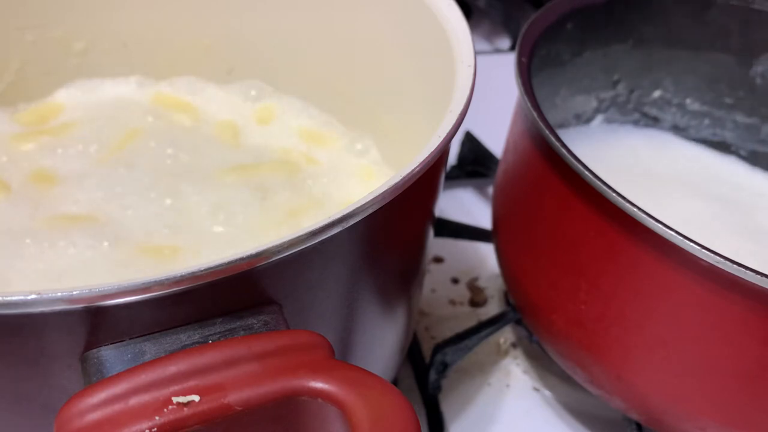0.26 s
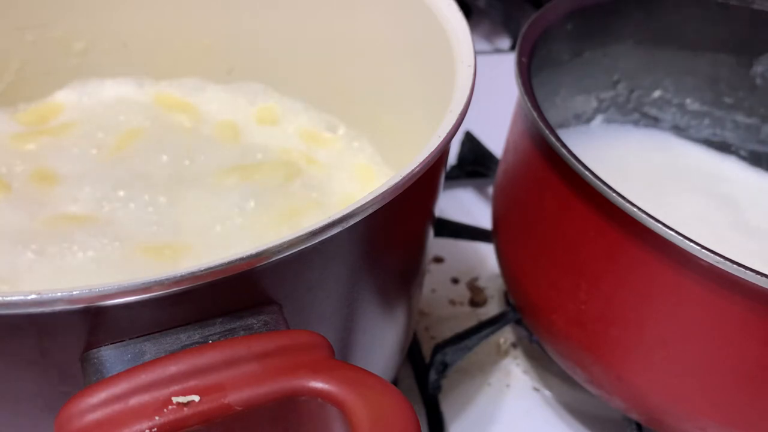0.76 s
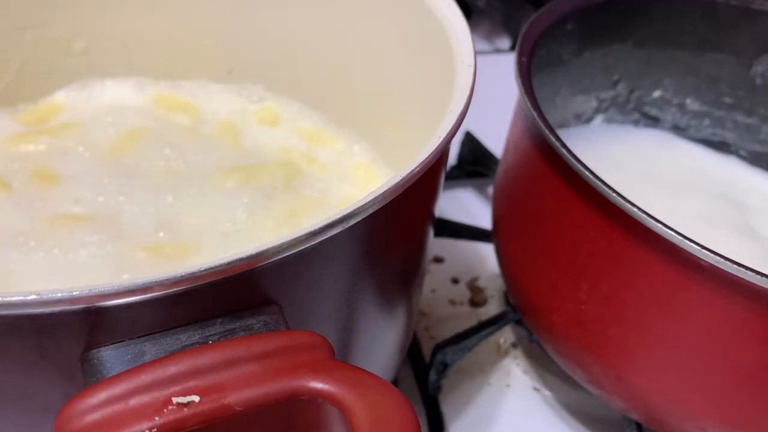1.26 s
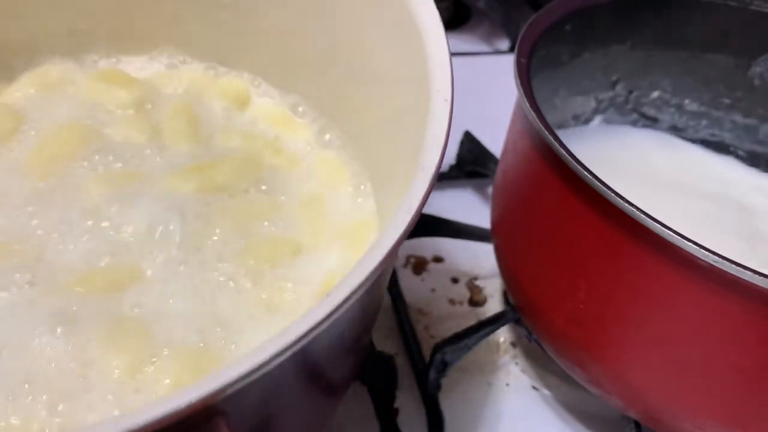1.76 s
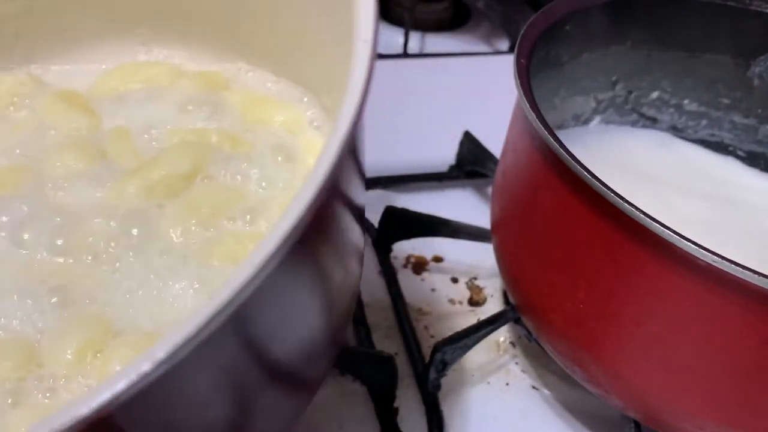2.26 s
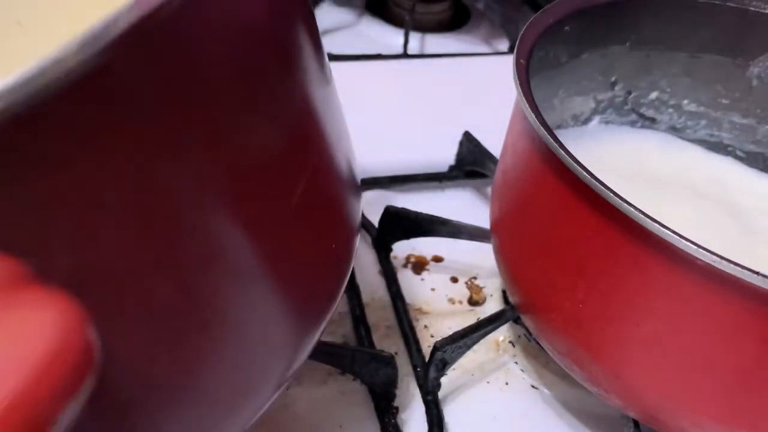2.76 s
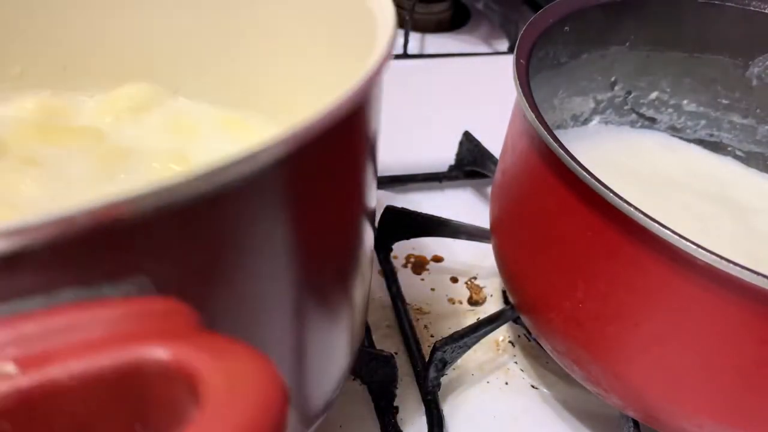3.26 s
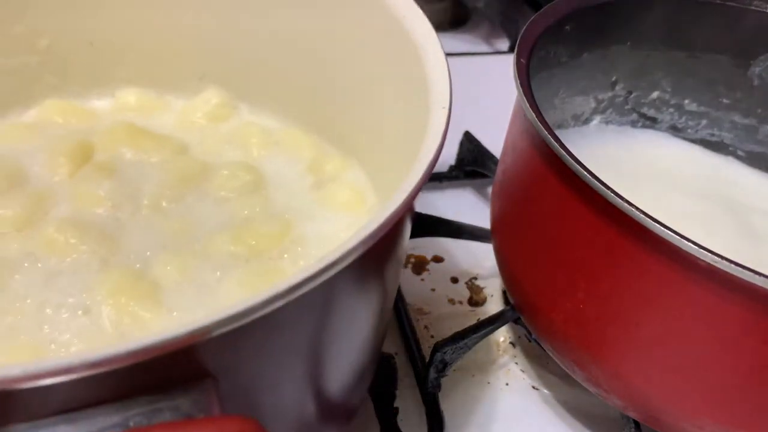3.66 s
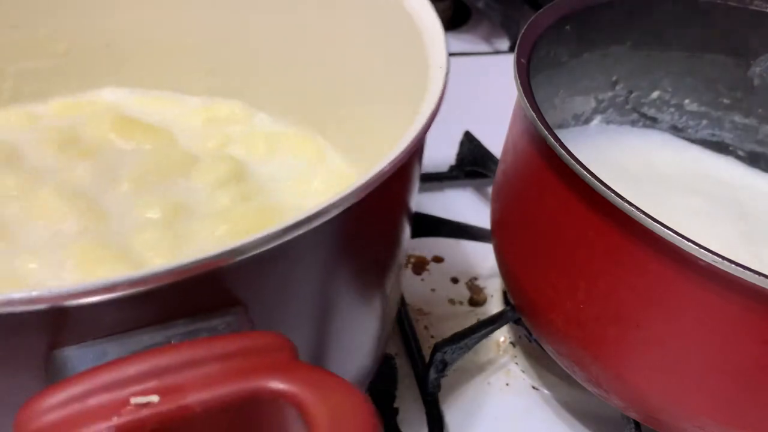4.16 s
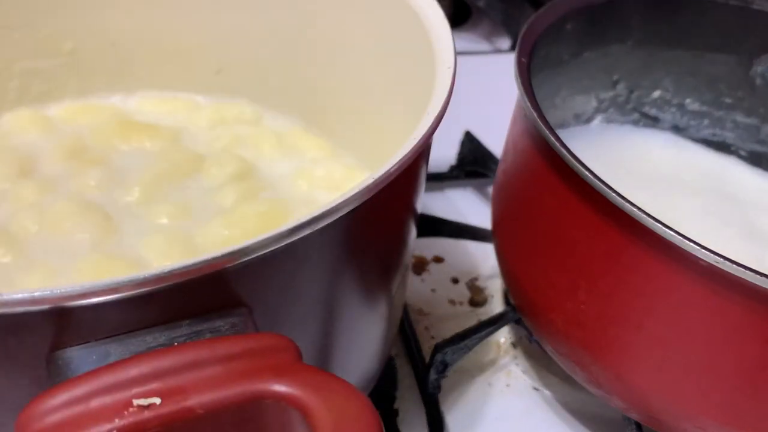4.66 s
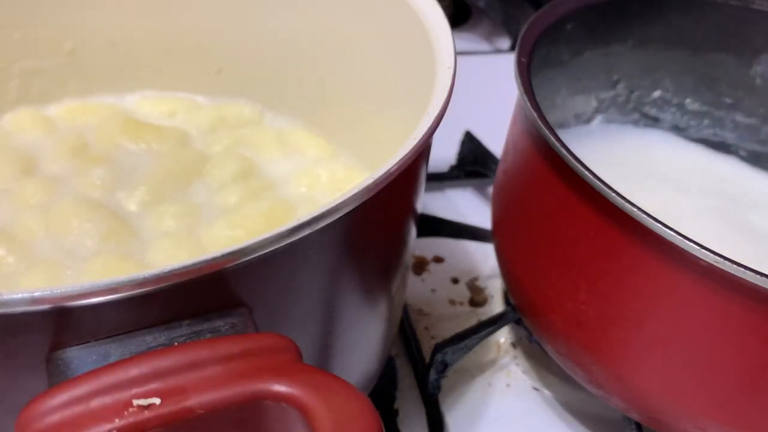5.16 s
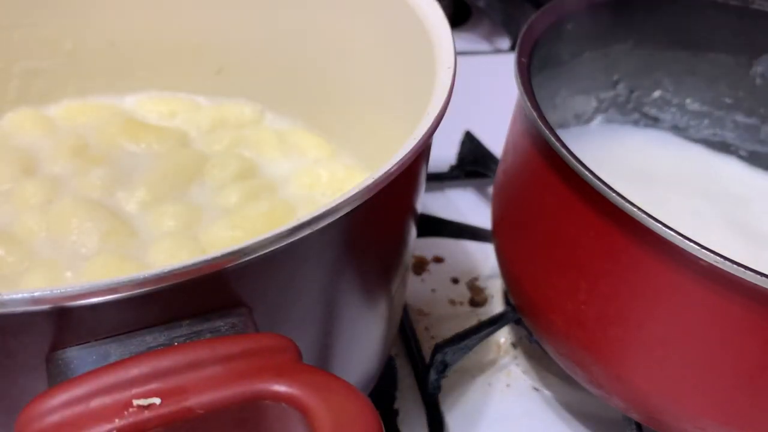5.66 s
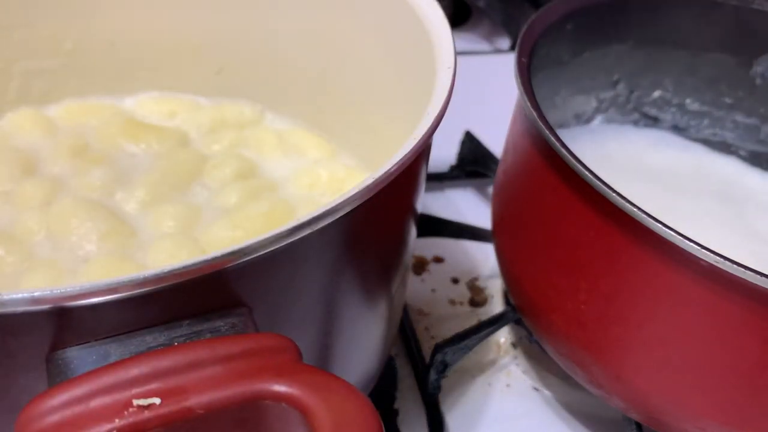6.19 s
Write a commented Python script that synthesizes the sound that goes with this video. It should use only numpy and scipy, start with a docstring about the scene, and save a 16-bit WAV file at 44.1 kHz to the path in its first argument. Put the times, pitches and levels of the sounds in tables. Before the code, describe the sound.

Syrup simmers in a pot on a gas stove, with soft gurgles, rounded plops and light fizz over a low burner rush and steady humming appliance. A bright tick comes early, dull thumps midway, then a cluster of rattling knocks, a loud sharp clack near four seconds and a heavy thud near six. Small kitchen, close stereo microphone.

```python
"""Syrup simmering on a gas stove

Thick syrup plops, spits and fizzes (ringing pot modes, short bubble tones, patchy noise) over the soft
burner rush (coloured noise) and an appliance humming at twice the mains rate (wavering, beating tones).
Now and then things knock on a counter or steel ware clinks (noise bursts and decaying modes); the small
kitchen answers by convolution with decaying taps. Two microphone ports hear it."""
import sys
import numpy as np
from scipy import signal
from scipy.fft import rfft, irfft
from scipy.io import wavfile
from scipy.ndimage import uniform_filter1d

SR = 44100
rng = np.random.default_rng(int(sys.argv[2]) if len(sys.argv) > 2 else 0)


def generate_wav(signal):
    """Clip the signal to [-1, 1] and save it as 16-bit WAV at the path in sys.argv[1]."""
    frames = np.transpose(np.atleast_2d(signal))
    scaled = np.clip(frames, -1, 1) * 32767
    pcm = np.round(scaled).astype(np.int16)
    wavfile.write(sys.argv[1], SR, pcm)


N = 283563


def gain_of(db):
    """Amplitude factor of a level in dB."""
    return 10 ** (np.asarray(db) / 20)


def evened(x):
    """Scales to rms 1."""
    return x / np.sqrt(np.mean(x ** 2) + 1e-20)


def smoothed(x, width, axis=-1):
    """Moving average run twice."""
    return uniform_filter1d(uniform_filter1d(x, width, axis), width, axis)


def read(points, hz, column=1):
    """Interpolates a table column over log frequency."""
    rows = np.array(points)
    return np.interp(np.log(hz + 1), np.log(rows[:, 0] + 1), rows[:, column])


def add(mix, s, sound):
    """Adds a two-row sound at s seconds, cut at the end of the mix."""
    part = mix[:, round(s * SR):][:, :sound.shape[1]]
    part += sound[:, :part.shape[1]]


def coloured(x, spectrum):
    """Filters x by a table of f/Hz, gain/dB."""
    hz = np.fft.rfftfreq(x.shape[1], 1 / SR)
    return irfft(rfft(x) * gain_of(read(spectrum, hz)), x.shape[1])


def patchy_noise(spectrum, patchy_db, flicker_db):
    """Two draws of noise that share drifting time-frequency patches and a wide flicker; rms 1."""
    frames = N // 128 + 5
    patches = uniform_filter1d(rng.standard_normal((257, frames)), 6, 0)
    patches = evened(uniform_filter1d(patches, 20, 1))
    flicker = evened(uniform_filter1d(rng.standard_normal(frames), 5))
    z = rng.standard_normal((2, 257, frames)) + 1j * rng.standard_normal((2, 257, frames))
    z = z * gain_of(patchy_db * patches + flicker_db * flicker)
    x = signal.istft(z, nperseg=512, noverlap=384)[1]
    return evened(coloured(x[:, :N], spectrum))


def rings(modes, t, rise_s, scatter_db, tilt_db=0, rattle=0, detune=0.017, grain_s=0.00076):
    """A struck body: each blow excites its modes unevenly, loose contact roughens them; peak 1."""
    hz, db, t60 = np.array(modes).T[:, :, None]
    level_draw, pitch_draw = rng.standard_normal((2, 2, len(modes), 1))
    chatter = evened(smoothed(rng.standard_normal((2, len(modes), len(t))), round(grain_s * SR)))
    tilt = tilt_db * np.log2(hz / hz.min())  # tilt_db is per octave
    level_db = db + tilt + scatter_db * level_draw - 60 * t / t60
    waves = (1 + rattle * chatter) * np.sin(2 * np.pi * hz * (1 + detune * pitch_draw) * t)
    x = (gain_of(level_db) * waves).sum(1) * (1 - np.exp(-t / rise_s))
    return x / abs(x).max()


def burst(spectrum, t, t60, rise_s=0.0011):
    """A dying puff of coloured noise, roughened by loose contacts after the first."""
    x = coloured(rng.standard_normal((2, len(t))), [(100, -85)] + spectrum + [(20000, -68)])
    x = evened(x) / 2
    contacts = evened(uniform_filter1d(rng.standard_normal(len(t)), 90))
    ragged = gain_of(3.2 * contacts * np.minimum(t / .004, 1))
    return x * ragged * gain_of(-60 * t / t60) * (1 - np.exp(-(t / rise_s) ** 2))


def bubble(hz, cycles, glide):
    """A gas cavity rings a few cycles, rising in pitch from hz as it opens."""
    u = np.arange(round(4 * cycles / hz * SR)) / SR * hz / cycles
    envelope = np.exp(-1.6 * u) * (1 - np.exp(-30 * u))
    return np.sin(2 * np.pi * cycles * (u + glide * u ** 2 / 2)) * envelope


def swarm(grains, per_s, spread_db):
    """Random train of grains of mixed shapes, a few of them large; rms 1."""
    size = gain_of(spread_db * np.minimum(rng.exponential(1, N), 5))
    size = size * (rng.random(N) < per_s / SR)
    kind = rng.integers(0, len(grains), (2, N))  # shapes drawn apart for each row
    trains = [signal.oaconvolve(size * (kind == k), g[None], axes=1)[:, :N] for k, g in enumerate(grains)]
    return evened(sum(trains))


def appliance():
    """A firm hum, wavering casing tones, and two close whines that beat slowly."""
    # tones: f/Hz, rms level/dB, waver bandwidth/Hz
    hum_tones = [(120, -45, 2), (593, -61.5, 12), (1185, -59.5, 31), (2015, -64.5, 70)]
    whine_hz, whine_db = 1443, -58.5
    beat_hz, beat_top_s, beat_share = 1.694, 0.38, .85
    t, out = np.arange(N) / SR, np.zeros((2, N))
    for hz, db, width_hz in hum_tones:
        r = np.exp(-np.pi * width_hz / SR)
        noise = rng.standard_normal((2, N)) + 1j * rng.standard_normal((2, N))
        waver = signal.lfilter([1 - r], [1, -r], noise)
        steady = 2.17 / width_hz * np.array([[1], [1j]])  # rows in quadrature
        tone = (steady + waver / abs(waver).mean() * 0.21) * np.exp(2j * np.pi * hz * t)
        out += gain_of(db) * evened(tone.real)
    beat = 1 + beat_share * np.exp(2j * np.pi * beat_hz * (t - beat_top_s))
    drift_rad = 0.78 * evened(uniform_filter1d(rng.standard_normal(N), 1500))
    flutter = gain_of(3 * evened(smoothed(rng.standard_normal(N), 600)))
    whine = beat * flutter * np.exp(1j * (2 * np.pi * whine_hz * t + drift_rad))
    return out + gain_of(whine_db) * evened(whine.real)


def burner():
    """Soft gas rush: low-weighted noise with slight patches and flicker."""
    # spectrum: f/Hz, relative density/dB
    rush_spectrum = [(12, -49), (25, -0.5), (45, 0.5), (85, 2.5), (170, -3), (300, -14), (520, -13),
                     (860, -20), (1500, -13.5), (2050, -24), (2750, -32.5), (4100, -33), (9000, -51)]
    rush_db = -46
    return gain_of(rush_db) * patchy_noise(rush_spectrum, patchy_db=0.56, flicker_db=0.15)


def kitchen(x):
    """Room answer: sparse taps of random sign, each band dying at its own speed."""
    # room bands: f/Hz, t60/s, relative level/dB
    room_bands = [(100, .24, -5), (400, .3, -3), (1500, .26, -4), (5000, .42, -14), (12000, .36, -13)]
    taps = np.zeros((2, SR // 2))
    at = np.arange(300, SR // 2 - 20, 20) + rng.integers(0, 20, (2, (SR // 2 - 301) // 20))
    np.put_along_axis(taps, at, rng.choice([-1., 1.], at.shape), 1)
    hz, t, z = signal.stft(taps, SR, nperseg=256)
    decay = gain_of(-60 * t / read(room_bands, hz)[:, None])
    tail = signal.istft(z * decay, SR, nperseg=256)[1]
    tail = coloured(tail / np.linalg.norm(tail[0]), [(f, db) for f, _, db in room_bands])
    return signal.fftconvolve(x, tail, axes=1)[:, :N]


def clinks():
    """Steel touches steel: a broad crack rings the ware briefly and leaves a bright sheen."""
    # contacts: t/s, click level/dB, sheen level/dB, favoured ring f/Hz, second ring f/Hz,
    # sheen t60/s, ring over click/dB
    contacts = [(0.2355, -35, -18, 6610, 4460, 0.11, 11), (1.91, -68, -42, 6460, 5120, 0.056, 0),
                (2.533, -47, -36.5, 5120, 6610, 0.033, -4), (3.1492, -41, -69, 2760, 5400, 0.035, 11),
                (3.27, -35, -28, 3830, 7400, 0.045, 13), (3.3446, -36, -34, 4000, 5500, 0.035, 13),
                (3.9063, -9.5, 0.5, 6560, 4560, 0.0075, -2), (4.7107, -56, -49, 3990, 2540, 0.093, 7),
                (5.2917, -63, -39.5, 6600, 5500, 0.083, -2), (5.5546, -42.5, -45, 2400, 3830, 0.075, 4),
                (6.074, -59.5, -47.5, 3880, 6610, 0.082, 8)]
    # steel utensil modes: f/Hz, relative level/dB, t60/s before the extra damping below
    ware_modes = [(2540, 4, 0.07), (2760, 3, 0.1), (3420, -5, 0.07), (3830, 1, 0.11), (4150, -2, 0.08),
                  (5120, 0, 0.07), (5500, -2, 0.07), (6340, -3, 0.05), (6610, -1, 0.08)]
    # sheen spectrum: f/Hz, relative density/dB
    sheen_spectrum = [(7900, -8), (9300, 3.5), (10400, -3.5), (11500, -5.5), (12600, -11), (14400, -10),
                      (16000, -20)]
    t, out = np.arange(SR // 6) / SR, np.zeros((2, N))
    for s, click_db, sheen_db, *favoured_hz, t60, ring_db in contacts:
        struck = []
        for f, db, ring_s in ware_modes:
            octaves_off = abs(np.log2(f / np.array(favoured_hz))).min()
            struck.append((f, db - 20 * octaves_off, ring_s))
        ring = rings(struck, t, 0.0012, 1.5, rattle=0.35, detune=0.004, grain_s=0.0022)
        ring = ring * gain_of(ring_db - 14 * t / t60)
        crack = burst([(1200, -3), (4500, 0), (7000, 2.5), (8200, -8)], t, 2.2 * t60)
        sheen = burst(sheen_spectrum, t, t60)
        add(out, s, gain_of(click_db) * (ring + crack) + gain_of(sheen_db) * sheen)
    return out


def knocks():
    """Clack of the object, the board's ringing modes, then the whole counter's thud."""
    # blows: t/s, thud level/dB, board level/dB, clack reference level/dB, clack ring f/Hz,
    # ring over clack reference/dB, thud lag/s, thud tilt/(dB/octave)
    blows = [(0.237, -42, -40, -26.5, 1185, 0, 0.004, 6), (2.3745, -21, -19, -26.5, 764, -17, 0.0071, 3),
             (2.3988, -20.5, -49, -43, 920, -13, 0.00069, 1), (2.5312, -34, -39, -42, 2120, -2, 0.0057, 2),
             (2.7692, -25.5, -26.5, -38.5, 664, 4, 0.02, -3), (3.15, -28.5, -25, -29, 1428, 4, 0.012, 13),
             (3.27, -22.5, -29, -23.5, 1805, -3, 0.009, -0.5),
             (3.3442, -26.5, -30.5, -24, 1455, 0, 0.013, 1), (3.425, -31.5, -29, -29.5, 1412, -2, 0.014, 3),
             (3.5049, -29, -22, -32.5, 1335, 0.5, 0.0066, -7),
             (3.9061, -17.5, -14.5, -19.5, 2375, -9, 0.0067, -1),
             (3.9206, -30, -27, -15.5, 1153, -8.5, 0.0065, 6),
             (4.7111, -37.5, -37.5, -38, 1200, -2, 0.0059, 15),
             (5.5554, -32.5, -34, -30.5, 1590, 1.5, 0.0052, 8.5),
             (6.0031, -11.5, -25.5, -23, 919, 0, 0.00536, 11.5),
             (6.0751, -27.5, -40, -41, 867, 6, 0.0014, 1)]
    # counter as a whole: f/Hz, relative level/dB, t60/s before damping
    thud_modes = [(95.7, -5.5, 0.12), (133.2, -5, 0.13), (161.6, -11, 0.049), (198.4, -8.5, 0.046)]
    # board: f/Hz, relative level/dB before tilt, t60/s
    board_modes = [(325, 1, 0.095), (430, -9, 0.05), (539, -6, 0.05), (620, -3, 0.07), (690, -3, 0.06),
                   (765, -1, 0.11)]
    ring_t60_s = 0.082
    hard_per_db = 1.5  # board tilt in dB/octave per dB of clack over thud
    t, out = np.arange(SR // 4) / SR, np.zeros((2, N))
    damping = gain_of(-4.5 * t / ring_t60_s)  # a hand or a soft surface shortens the thud
    for s, thud_db, board_db, clack_db, hz, ring_db, lag_s, thud_tilt_db in blows:
        tilt_db = hard_per_db * (clack_db - thud_db)
        clack_spectrum = [(0.047 * hz, -12), (hz, 0), (1.41 * hz, -4), (3.2 * hz, -18)]
        clack = 0.8 * burst(clack_spectrum, t, 1.5 * ring_t60_s, rise_s=0.001)
        ring = gain_of(ring_db) * rings([(hz, 0, ring_t60_s)], t, 0.00064, 0, rattle=0.57)
        board = rings(board_modes, t, 0.0021, 3.2, tilt_db, rattle=0.54, grain_s=0.0093)
        thud = rings(thud_modes, t, 0.0054, 3.3, thud_tilt_db) * damping
        add(out, s, gain_of(clack_db) * (clack + ring))
        add(out, s, gain_of(board_db) * board)
        add(out, s + abs(lag_s), gain_of(thud_db) * thud)
    return out


def simmer():
    """Bursting bubbles ring the pot, small pops tick at the surface, and the froth fizzes."""
    # boil course: t/s, gurgle level/dB, fizz level/dB
    boil_course = [(0, -49, -60.5), (1.102, -53, -59.5), (1.45, -52, -57.5), (2.45, -49, -56),
                   (2.9, -51.5, -60.5), (6.43, -56.5, -62)]
    # single large bubbles: t/s, plop level/dB, plop start f/Hz, spit level/dB, spit start f/Hz
    large_bubbles = [(0.05, -47, 457, -37.5, 910), (0.092, -42, 620, -36.5, 1180),
                     (0.394, -35.5, 1040, -51, 1100), (0.774, -41.5, 593, -42, 3000),
                     (0.999, -44, 720, -42, 2390), (1.062, -47, 1780, -44, 3050),
                     (1.2808, -42.5, 467, -41, 960), (1.493, -37, 640, -32, 2420),
                     (1.84, -37, 620, -35.5, 2350), (1.969, -42, 460, -36.5, 2550),
                     (2.105, -50, 600, -40, 2300), (2.143, -38.5, 590, -41, 2820),
                     (3.6415, -35.5, 594, -34, 1200), (4.895, -43, 460, -39, 1000),
                     (5.129, -34, 443, -40, 1040), (5.447, -38, 450, -34, 1050)]
    # pot air and wall modes: f/Hz, relative level/dB, t60/s
    pot_modes = [(218.3, 1, 0.058), (297.3, -1, 0.047), (455.6, -1.5, 0.046), (620.5, -2.5, 0.041),
                 (774, -4.5, 0.041), (1010, -4.5, 0.023)]
    # froth spectrum: f/Hz, relative density/dB
    fizz_spectrum = [(300, -69), (1500, 13), (2500, 7.5), (4100, 4), (5500, -1.5), (6900, 5), (7750, -9),
                     (8700, 3), (10300, 0.5), (12400, -8), (13800, 2), (15000, -57), (16000, -12)]
    course_s, gurgle_db, fizz_db = np.transpose(boil_course)
    t = np.arange(N) / SR
    plops = [rings(pot_modes, t[:3000], 0.0012, 5.0, detune=.05)[0] for _ in range(10)]
    pops = [bubble(hz, 2.3, 0.15) for hz in np.geomspace(600, 2600, num=8)]
    ticks = [bubble(hz, 0.25, 0.13) for hz in np.geomspace(3000, 14000, num=6)]
    popping = swarm(pops, per_s=300, spread_db=3)
    gurgle = swarm(plops, per_s=330, spread_db=2.9) + gain_of(-9.5) * popping
    ticking = evened(coloured(swarm(ticks, per_s=1800, spread_db=0.43), fizz_spectrum))
    fizz = patchy_noise(fizz_spectrum, patchy_db=4.0, flicker_db=0.99) + gain_of(-7.0) * ticking
    out = gain_of(np.interp(t, course_s, gurgle_db)) * gurgle
    out += gain_of(np.interp(t, course_s, fizz_db)) * fizz
    for s, plop_db, hz, spit_db, spit_hz in large_bubbles:
        plop = np.outer([1, 1], bubble(hz, 6.7, 0.004))
        spit = np.outer([1, 1], bubble(spit_hz, 3.5, 0.039))
        spray_spectrum = [(.4 * spit_hz, -12), (spit_hz, 0), (1.8 * spit_hz, -20)]
        spray = burst(spray_spectrum, t[:2000], 0.03, rise_s=.0004)
        add(out, s, gain_of(plop_db) * plop)
        add(out, s, gain_of(spit_db) * spit)
        add(out, s, gain_of(spit_db) * spray)
    return out


def scene():
    """Row one is what both ports share, row two what only the right one hears."""
    hum, rush = appliance(), burner()
    sources = clinks() + knocks() + simmer()
    return sources + kitchen(sources) + rush + hum


def record(dry):
    """The right port gets a phase-turned share of the left; then the band limit."""
    # port pair: f/Hz, likeness/(0-1), left over right/dB
    port_pair = [(60, 0.87, 1.5), (143, 0.9, -5), (286, 0.5, 1.5), (915, 0.35, 2), (2010, 0.16, 1),
                 (3300, 0.26, 0), (5500, 0, -2.5), (6300, 0.33, -4), (7400, 1, 5), (11000, 0.97, -1)]
    right_lead_s, turn_rad, turn_hz = .000217, -8.9, 1150  # right leads; phase turns back around turn_hz
    edge_hz = 16400
    hz = np.fft.rfftfreq(N, 1 / SR)
    same = np.clip(read(port_pair, hz), 0, 1)
    phase = 2 * np.pi * hz * right_lead_s + turn_rad * hz ** 2 / (hz ** 2 + turn_hz ** 2)
    left, own = rfft(dry)
    right = same * np.exp(1j * phase) * left + np.sqrt(1 - same ** 2) * own
    tilt = gain_of(read(port_pair, hz, column=2) / 2)
    vent = hz ** 2 / (hz ** 2 + 40 ** 2)  # the capsules lose the deepest bass
    ports = irfft(np.array([left * tilt, right / tilt]) * vent, N)
    lowpass = signal.firwin(511, edge_hz, window=("kaiser", 9), fs=SR)
    return signal.oaconvolve(ports, lowpass[None], "same")


dry = scene()
out = record(dry)
generate_wav(out)
```